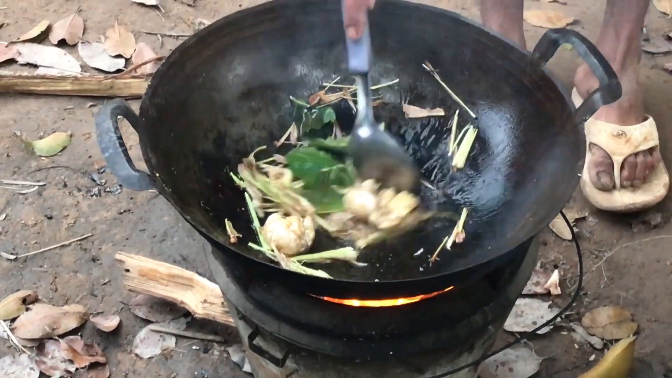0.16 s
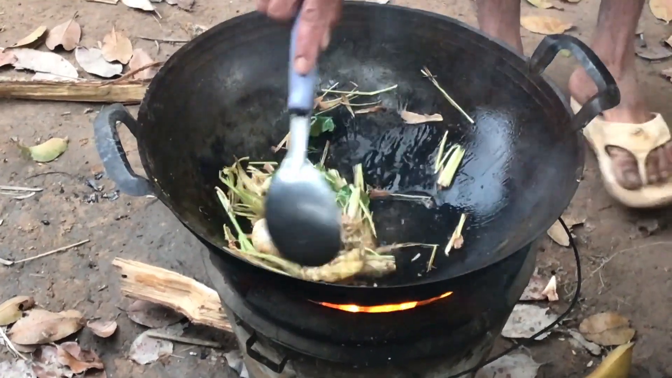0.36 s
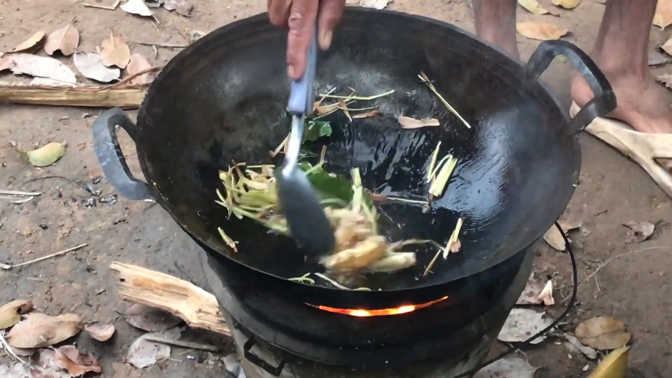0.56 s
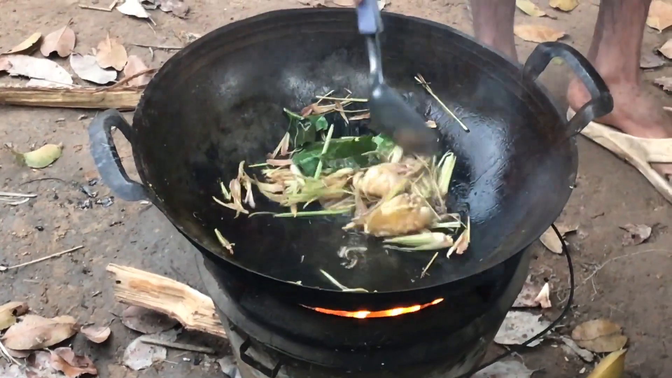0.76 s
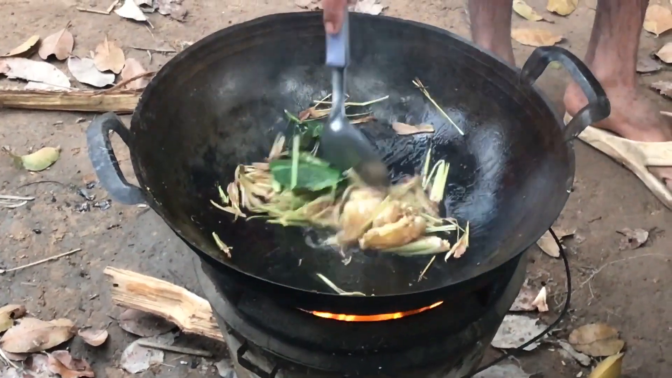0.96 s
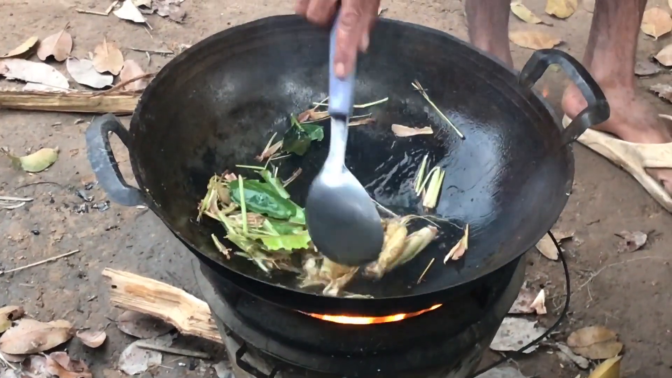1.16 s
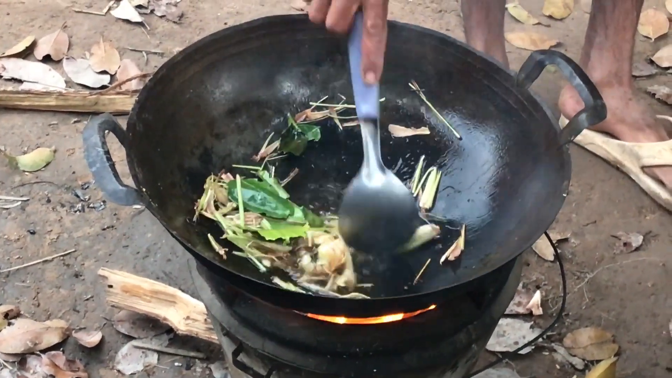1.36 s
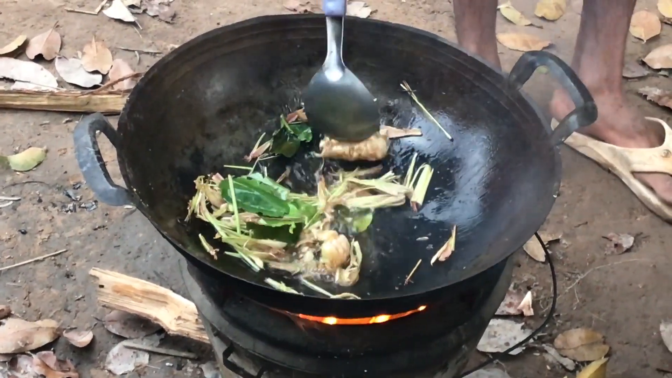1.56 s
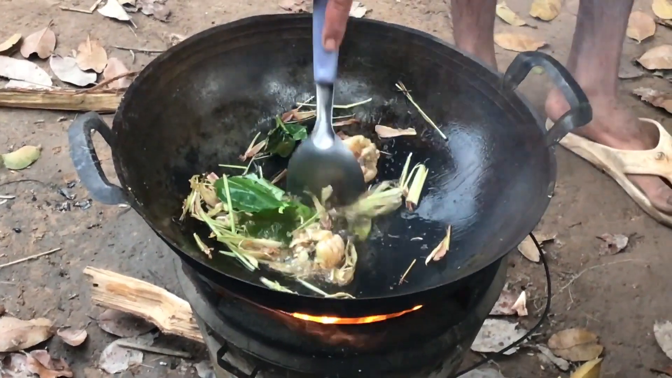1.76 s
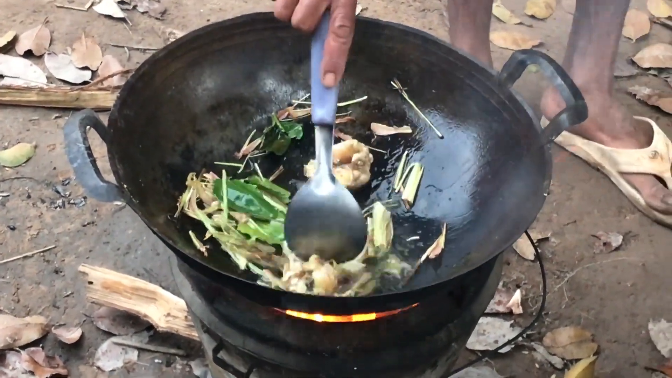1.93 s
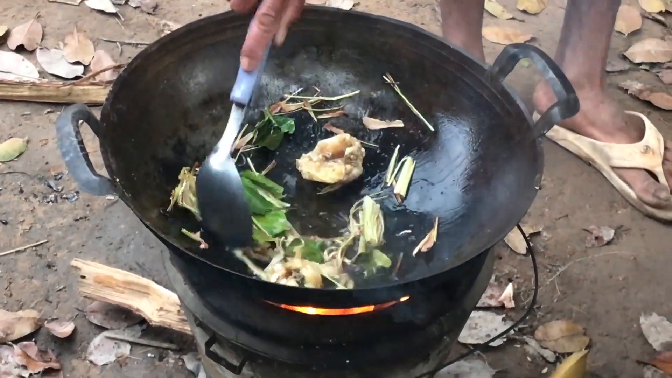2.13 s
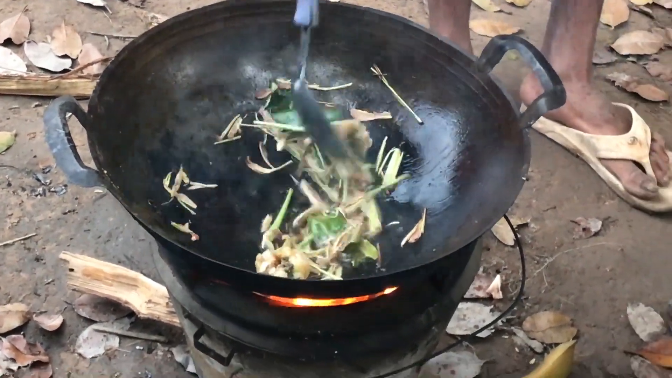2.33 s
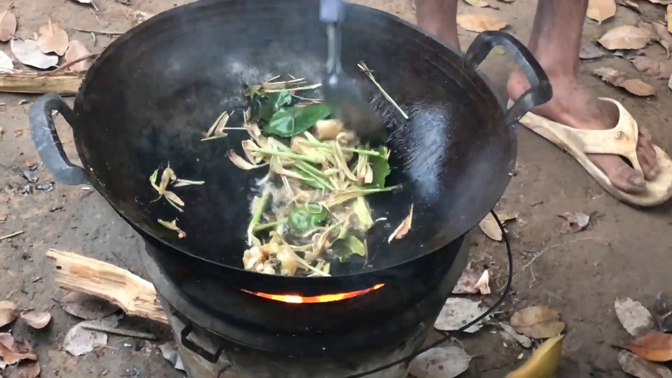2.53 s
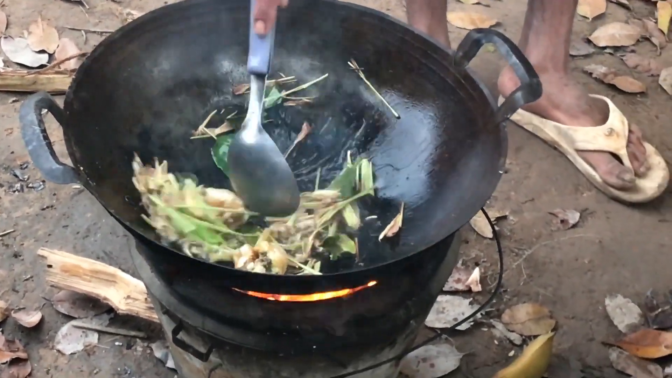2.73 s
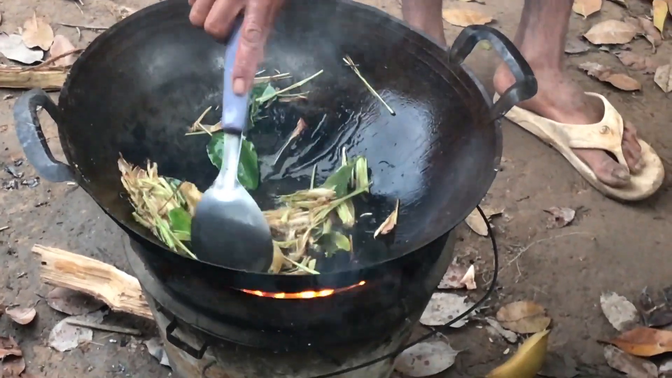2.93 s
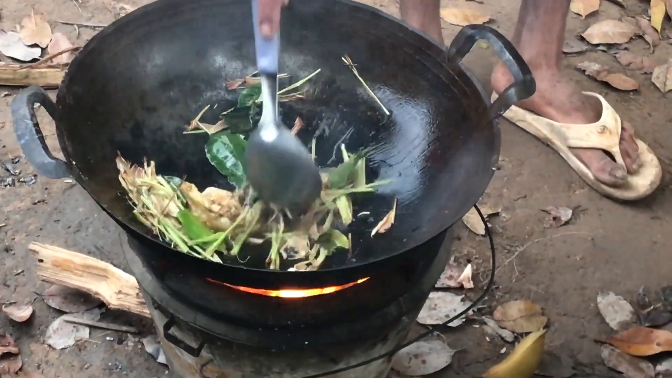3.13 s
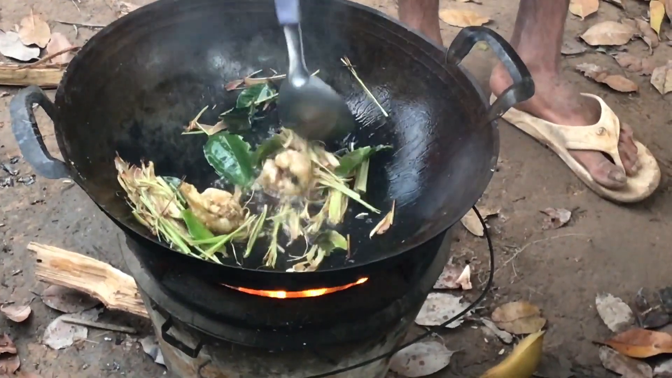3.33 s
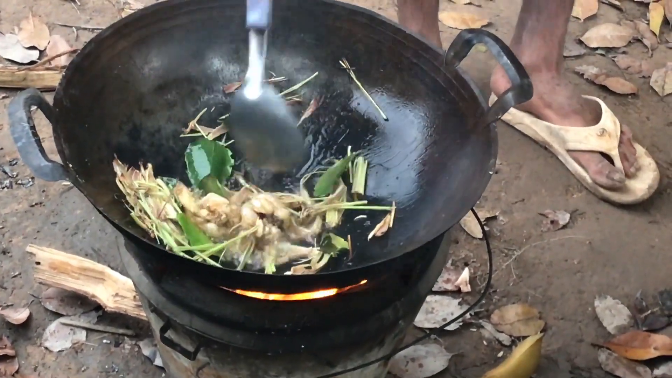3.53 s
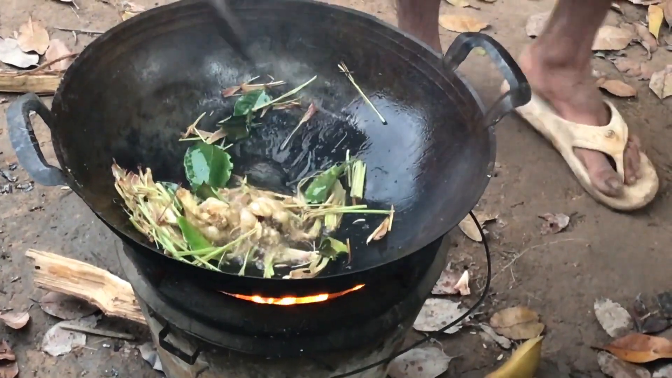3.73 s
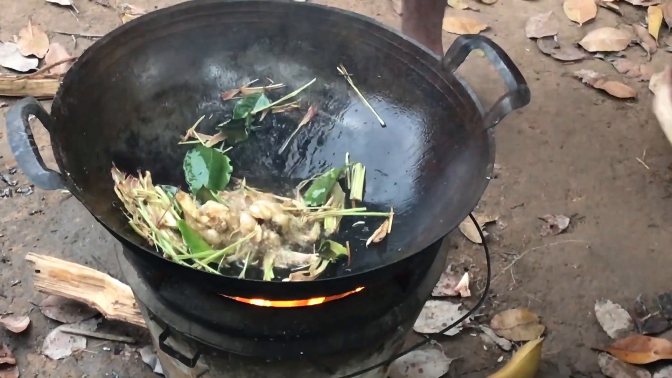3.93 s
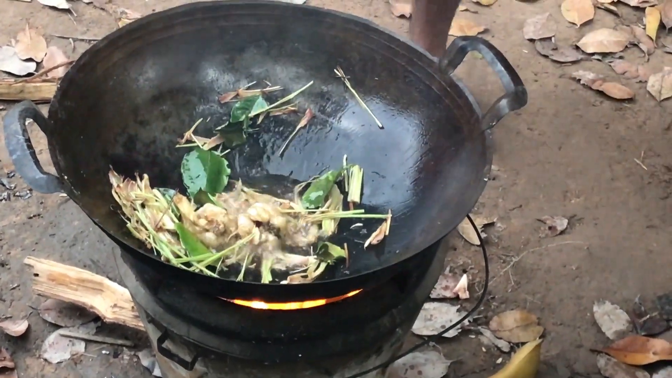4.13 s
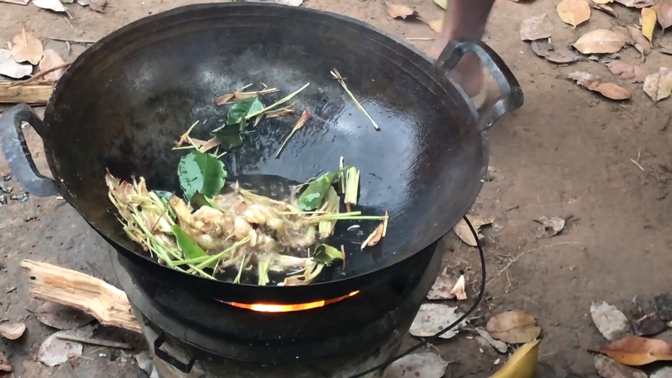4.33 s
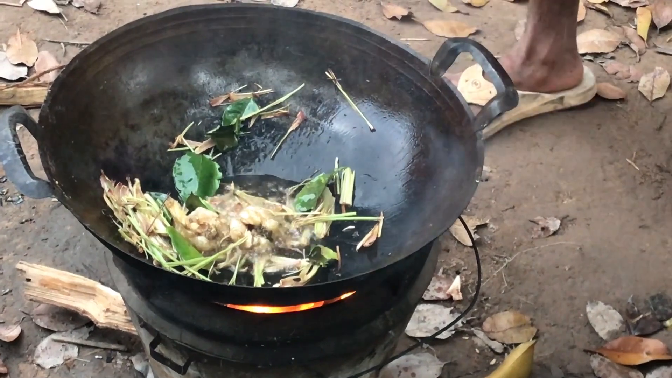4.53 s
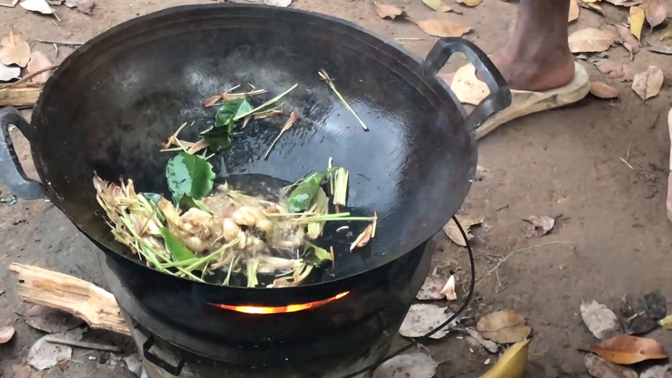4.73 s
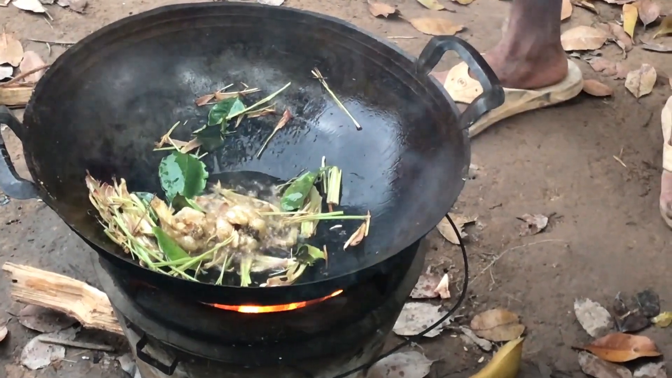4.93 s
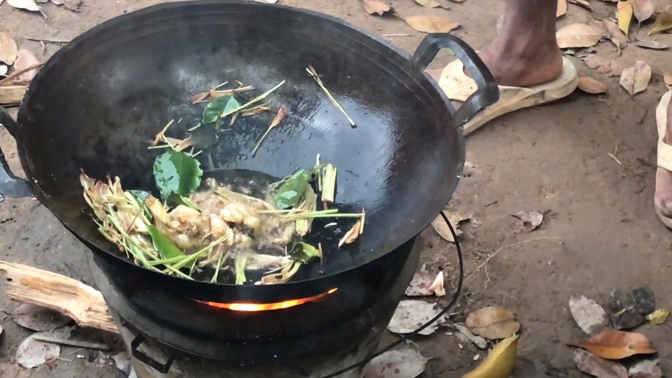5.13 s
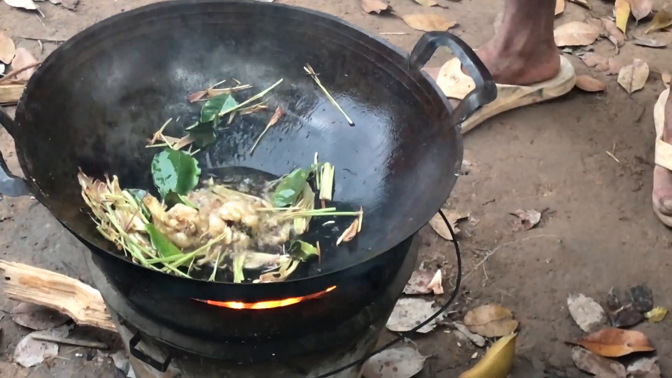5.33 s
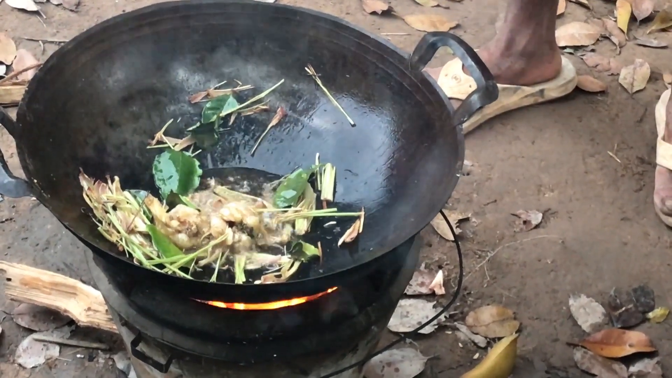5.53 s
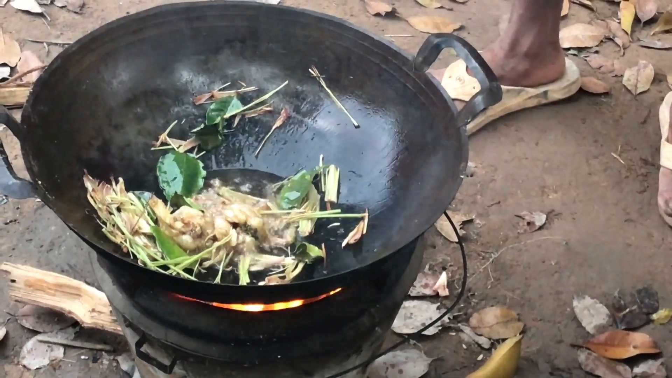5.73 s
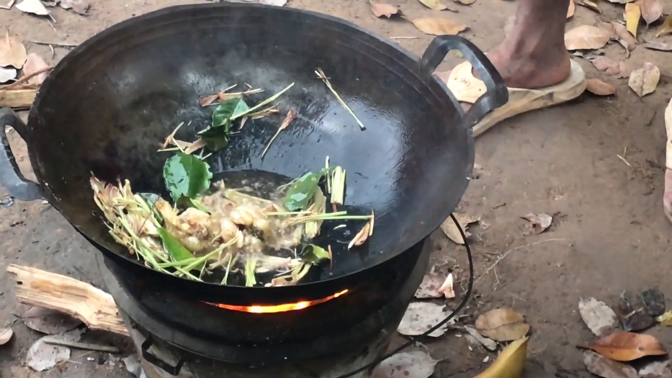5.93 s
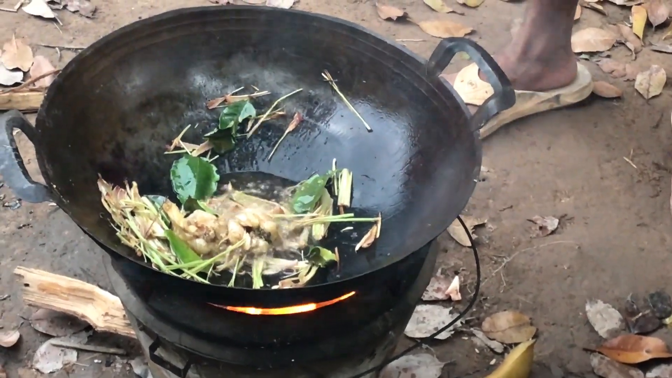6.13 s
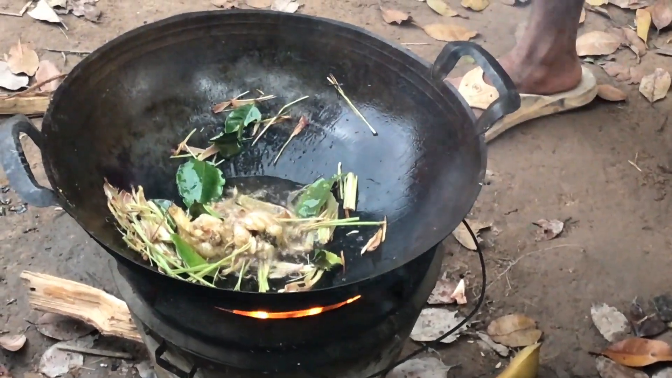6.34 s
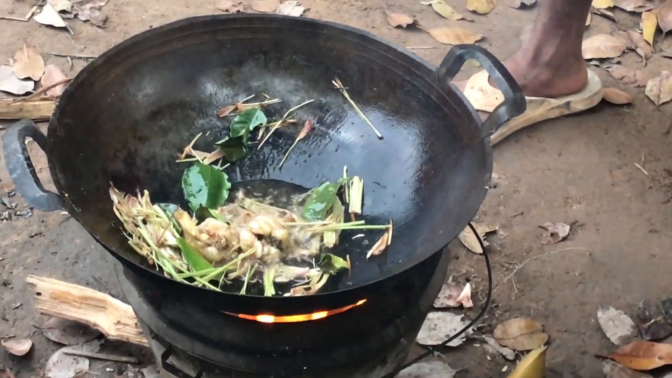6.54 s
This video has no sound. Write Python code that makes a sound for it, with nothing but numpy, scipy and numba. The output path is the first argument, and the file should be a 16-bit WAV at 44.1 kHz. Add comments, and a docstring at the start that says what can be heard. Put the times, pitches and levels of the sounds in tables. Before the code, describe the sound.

Food sizzles and spits in an oily wok outdoors while a metal spoon knocks and scrapes for three seconds, then the frying crackles on, slowly fading.

```python
"""Chicken and herbs fry in a wok outdoors on a charcoal stove: a steady sizzle that slowly dies down.
For about three seconds a metal spoon knocks, scrapes and taps the pan; one late tap and soft scuffs follow.
Clicks through colour filters make the fizzing oil, sharp bursts the pops, and filtered noise the spitting
steam; fading tones make the ringing metal. A wavering rumble, two hums and soft air lie underneath."""
import sys
import numpy as np
from scipy import signal
from scipy.fft import rfft, irfft
from scipy.io import wavfile
from scipy.ndimage import uniform_filter1d
from numba import njit

SR = 44100
rng = np.random.default_rng(int(sys.argv[2]) if len(sys.argv) > 2 else 0)


def file_out(sig):
    """Save sig as 16-bit WAV at sys.argv[1]."""
    # one column per channel
    cols = np.atleast_2d(sig).T
    # limit, then scale
    lim = np.clip(cols, -1, 1)
    pcm = np.round(lim * 32767).astype(np.int16)
    wavfile.write(sys.argv[1], SR, pcm)


N = 295029
T = np.arange(N) / SR  # time through the whole scene [s]
HIT = T[:SR // 4]  # time through one short sound [s]

# ringing of the wok: (frequency [Hz], width [Hz], relative level [dB]); a wider mode fades sooner
WOK_MODES = [(207, 19, -9), (318, 50, 6.5), (388, 44, 2), (574, 41, -1), (765, 44, -6), (914, 20, -2.5),
             (1240, 32, -5.5), (1590, 27, -5), (1700, 19, -4), (1920, 66, -8), (2080, 110, 7),
             (2244, 71, -2.5), (2470, 89, 2.5), (2817, 61, -3.5), (3006, 82, -0.5), (3150, 27, -27),
             (3500, 15, -7.5), (3400, 38, -6), (3720, 23, -4), (3740, 41, -12), (5200, 26, -13),
             (5300, 42, -5.5)]
# colour of the mid simmer, also used for grit and snaps: (frequency [Hz], relative level [dB])
SIMMER_COLOUR = [(300, -43.5), (520, -11), (780, -9.5), (1200, -4.5), (1700, -4), (2200, -3.5), (2800, -1),
                 (3450, 0), (4200, -1.5), (5300, -10), (7000, -17), (9000, -19.5), (14000, -30.5)]
# colour of the fine fizz: (frequency [Hz], relative level [dB])
FIZZ_COLOUR = [(700, -4), (1200, 0.5), (3000, -13), (5500, 10), (7200, -3), (8800, 6.5), (10300, 0.5),
               (11500, 3), (14000, 2.5), (15500, -5.5), (16500, -13)]


def undb(db):
    """Turn decibels into a gain."""
    return 10 ** (np.asarray(db) / 20)


def unit(x):
    """Scale to a peak of one."""
    return x / np.abs(x).max()


def level(x, db, lo, hi):
    """Scale so that the part between lo and hi Hz has the given rms level."""
    f = np.arange(len(x) // 2 + 1) * SR / len(x)
    in_band = (f > lo) & (f < hi)
    band = irfft(rfft(x) * in_band, len(x))
    return x * undb(db) / np.std(band)


def add(out, s, x):
    """Mix in a sound that starts at s seconds."""
    i = max(int(s * SR), 0)
    out[i:i + len(x)] += x[:max(N - i, 0)]


def colour(x, points, size=1024):
    """Shape the tone through (Hz, dB) points with a filter that never acts ahead of its input."""
    hz, db = np.transpose(points)
    f = np.maximum(np.arange(size // 2 + 1) * SR / size, 1)
    gain = undb(np.interp(np.log(f), np.log(hz), db))
    # folding the cepstrum puts the filter's energy as early as possible
    cepstrum = irfft(np.log(gain))[:size // 2]
    cepstrum[1:] *= 2
    response = irfft(np.exp(rfft(cepstrum, size)))
    return signal.fftconvolve(x, response)[:len(x)]


def walk(rate):
    """Wander smoothly and at random, with about `rate` new steps a second and a spread near one."""
    k = int(SR / rate)
    steps = np.repeat(rng.standard_normal(N // k + 1), k)
    smooth = uniform_filter1d(uniform_filter1d(steps, k), k)
    return smooth[:N] * np.sqrt(2)


def ring(modes, size=SR // 4):
    """Add up fading tones; random strengths and signs stand for different contact points."""
    hz, width, db = np.transpose(modes)[:, :, None]
    t = HIT[:size]
    sign = rng.choice([-1, 1], hz.shape)
    gain = undb(db + rng.standard_normal(hz.shape)) * sign
    return np.sum(gain * np.exp(-np.pi * width * t) * np.sin(2 * np.pi * hz * t), axis=0)


def clicks(rate, spread_db, cap_db):
    """Scatter `rate` clicks a second, with random signs and an exponential spread of sizes in dB."""
    size = undb(np.minimum(spread_db * rng.exponential(size=N), cap_db))
    return (rng.random(N) < rate / SR) * size * rng.choice([-1, 1], N)


@njit
def bandpass(x, hz, width):
    """Let one band through with a state-variable filter whose centre may move."""
    y, b, l = np.empty(len(x)), 0., 0.
    for i in range(len(x)):
        g, k = np.tan(np.pi * hz[i] / SR), width / hz[i]
        v = (b + g * (x[i] - l)) / (1 + g * (g + k))
        b, l, y[i] = 2 * v - b, l + 2 * g * v, k * v
    return y


def frying():
    """Simmer and fizz sink steadily in dB as the food dries, and rise with each flare."""
    # the spoon turns wet food onto hot iron and frying flares: (time of the height [s], rise [dB])
    flare_list = [(0.018, 7), (0.83, 4), (1.12, 4), (2.2, 5.5), (2.57, 4.5), (3.82, 0.5)]
    rise_s, fall_s = 0.17, 0.086
    simmer_start_db, simmer_fall_db_per_s = -63, 0.86
    fizz_start_db, fizz_fall_db_per_s = -70.5, 1.33
    fizz_share = 0.41  # part of a flare's rise in dB that the fizz follows
    flare = sum(db * np.exp(-np.abs(T - s) / np.where(T < s, rise_s, fall_s)) for s, db in flare_list)
    simmer_level = simmer_start_db - simmer_fall_db_per_s * T + flare
    fizz_level = fizz_start_db - fizz_fall_db_per_s * T + fizz_share * flare
    return simmer_level, fizz_level


def sizzle(simmer_db=-0.5, fizz_db=-3, crackle_db=-4, sputter_db=-7):
    """Countless bubbles simmer in the food and fizz on hot iron, with sharper droplets in both."""
    simmer_level, fizz_level = frying()
    bubbles = clicks(rate=5000, spread_db=3.8, cap_db=20) * undb(2 * walk(60))
    mist = clicks(rate=7000, spread_db=3.6, cap_db=20)
    # stirring spreads juice over the iron: the stronger the fizz, the more droplets burst each second
    droplets = 150 * undb(fizz_level + 70 + 3 * walk(12))
    crackle = clicks(rate=droplets, spread_db=6.5, cap_db=19)
    sputter = clicks(rate=droplets, spread_db=6, cap_db=18)
    # every crackling droplet throws a little spray after its snap
    t = HIT[:256]
    spray = (t == 0) + .035 * rng.standard_normal(256) * np.exp(-t / .002)
    crackle = signal.fftconvolve(crackle, spray)[:N]
    simmer = level(colour(bubbles, SIMMER_COLOUR), simmer_db, 2000, 5000)
    simmer += level(colour(sputter, SIMMER_COLOUR), sputter_db, 2000, 5000)
    fizz = level(colour(mist, FIZZ_COLOUR), fizz_db, 8000, 15000)
    fizz += level(colour(crackle, FIZZ_COLOUR), crackle_db, 8000, 15000)
    return simmer * undb(simmer_level) + fizz * undb(fizz_level)


def background(rumble_hz=64.15, rumble_width_hz=10.2):
    """Narrow noise rumbles, a sine hums like a distant motor, a higher one fades, and soft air hisses."""
    # slow course of the rumble, before its quick waver: (time [s], level [dB])
    rumble_course = [(0, -53.5), (1.2, -56.5), (1.6, -51), (2.95, -59.5), (3.3, -56), (4.4, -52.5),
                     (4.7, -60), (5.15, -50.5), (5.8, -59.5), (6.12, -47.5), (6.5, -65.5), (6.68, -52)]
    # colour of the outdoor air, capped at -13 dB below: (frequency [Hz], relative level [dB])
    air_colour = [(12, -57), (20, -18), (41, -5), (60, 1), (103, -6), (119, -7.5), (144, -15), (218, -24),
                  (363, -27), (440, -34), (698, -40), (780, -71), (900, -34.5), (1170, -60), (1980, -120)]
    hum_hz, hum_db = 93.2, -58.5
    faint_hz, faint_start_db, faint_fall_db_per_s = 255, -68.5, 3.5

    centre = np.full(N, 1. * rumble_hz)
    rumble = bandpass(rng.standard_normal(N), centre, 1. * rumble_width_hz)
    rumble = bandpass(rumble, centre, 2. * rumble_width_hz)
    rumble /= np.sqrt(uniform_filter1d(rumble ** 2, SR // 4))  # even out its own swells
    rumble *= undb(np.interp(T, *np.transpose(rumble_course)) + 1.5 * walk(7.7))

    hum_gain = np.sqrt(2) * undb(hum_db + 0.37 * walk(6.0))
    hum = hum_gain * np.sin(2 * np.pi * np.cumsum(hum_hz + 0.27 * walk(2.1)) / SR)
    faint_gain = np.sqrt(2) * undb(faint_start_db - faint_fall_db_per_s * T + 2 * walk(10))
    hum += faint_gain * np.sin(2 * np.pi * np.cumsum(faint_hz + 7 * walk(25)) / SR)

    air = colour(rng.standard_normal(N), [(hz, min(db, -13)) for hz, db in air_colour], size=16384)
    return rumble + hum + level(air, -65.5, 114, 960)


def crunch(decay_s):
    """Metal meets crust in a short, gritty burst of fading noise."""
    return colour(rng.standard_normal(len(HIT)) * np.exp(-HIT / decay_s), SIMMER_COLOUR)


def knocks(swell_s=0.0013, bend_s=0.0023, lag_s=.003, clack_db=1, clink_db=-2, ring_db=-24,
           shudder_db=-22, boom_db=2, boom_hz=178):
    """The food-damped pan knocks dully; bending waves bring the highs first, so the note drops."""
    # spoon knocks on the wok; the note scales a falling pitch, the boom is the pan on the stove:
    # (time [s], relative level [dB], clack [dB], clink [dB], note [Hz], boom [dB])
    knock_list = [(0.041, -27, -17.5, -19, 325, -36), (0.434, -30.5, -15.5, -17, 318, -40),
                  (0.851, -22.5, -6, -7, 380, -20), (1.278, -27.5, -22, -7.5, 320, -30),
                  (1.724, -30.5, -43, -21, 310, -42), (2.1, -29, -15.5, -5.5, 320, -39),
                  (2.512, -25.5, -6.5, -9, 363, -17), (2.929, -40.5, -27, -16, 313, -29),
                  (3.068, -20, -21, -19, 331, -13), (3.082, -28.5, -21, -36, 350, -4.5),
                  (3.117, -35, -35, -26, 316, -21), (3.126, -35, -43, -37, 340, -9),
                  (3.166, -41, -38, -34, 304, -10), (3.354, -27.5, -53, -17.5, 336, -18)]
    # short-lived modes under a hard blow: (frequency [Hz], width [Hz], relative level [dB])
    clack_modes = [(610, 390, -3), (850, 96, 2), (1100, 150, 7.5)]
    # short-lived modes of the pressed spoon: (frequency [Hz], width [Hz], relative level [dB])
    spoon_modes = [(2213, 85, -5), (3267, 113, -0.5), (4580, 630, 3.5), (5220, 720, -8.5)]
    shudder_colour = [(100, -60), (190, -2.5), (330, -0.5), (560, 1.5), (760, -24), (2000, -41)]
    out = np.zeros(N)
    for s, db, clack, clink, hz, weight in knock_list:
        pitch = hz * (0.83 + 0.98 * np.exp(-HIT / bend_s))
        swell = HIT ** 2 * np.exp(-HIT / swell_s)
        thud = unit(swell * np.sin(2 * np.pi * np.cumsum(pitch) / SR))
        shudder = colour(rng.standard_normal(len(HIT)), shudder_colour)
        shudder *= np.exp(-HIT / .021) / np.std(shudder)
        boom = HIT * np.exp(-HIT / .0045) * np.sin(2 * np.pi * boom_hz * HIT)
        hard = np.zeros(len(HIT))
        for k, (f, w, g) in enumerate(clack_modes):
            mode = np.exp(-np.pi * w * HIT) * np.sin(2 * np.pi * f * HIT)
            hard += mode * undb(g) * (-1) ** k  # signs alternate from mode to mode
        metal = unit(ring(spoon_modes)) + .3 * unit(crunch(.006))
        # each part is set against the strength of the thud
        parts = [(boom, weight + boom_db), (hard, clack + clack_db), (metal, clink + clink_db)]
        contact = sum(undb(share) * part / np.std(part) for part, share in parts)
        low_modes = unit(ring([m for m in WOK_MODES if m[0] < 1000]))
        tail = undb(shudder_db) * shudder + undb(ring_db) * low_modes
        add(out, s + lag_s, undb(db) * (thud + np.std(thud) * contact + tail))
    return out * undb(2.5)


def puff(hz, width_hz=1980.0, decay_s=0.0065, spray_db=-20, crackle_db=-9, snap_db=-6):
    """The oil film snaps and steam tears through in crackles, usually rising a little in pitch."""
    # tone of escaping steam: (frequency [Hz], relative level [dB])
    steam_colour = [(500, -23), (1200, 0), (2200, 2.5), (3500, 3), (5300, -5), (7000, -10.5), (12000, -28)]
    t = HIT[:2048]
    glide = 1 + rng.uniform(-.05, .35) * (.5 - np.exp(-t / .005))
    centre = np.clip(hz * glide, 500, SR / 4)
    flow = np.exp(-t / (decay_s * rng.uniform(.6, 1.4))) + undb(spray_db) * np.exp(-t / .011)
    # uneven random strength makes the gas crackle
    gas = rng.standard_normal(len(t)) * np.sqrt(rng.exponential(size=len(t))) * flow
    hiss = bandpass(bandpass(gas, centre, 1. * width_hz), centre, 1. * width_hz)
    crackle = undb(crackle_db) * unit(colour(gas, SIMMER_COLOUR))
    snap = undb(snap_db) * rng.uniform(0, 0.75) * unit(colour(1. * (t == 0), SIMMER_COLOUR))
    return unit(colour(unit(hiss) + crackle + snap, steam_colour))


def spits(gain_db=3, small_db=-50, spread_db=6.0, follow=0.14, count=200):
    """Steam escapes in single loud puffs among many small ones, stronger while the food fries hard."""
    # the loudest puffs from the food: (time [s], relative level [dB], nominal pitch [Hz])
    puff_list = [(0.1583, -40, 3080), (0.819, -41, 3520), (1.1184, -45, 2930), (1.344, -38.5, 2480),
                 (1.3686, -42, 3470), (1.877, -41.5, 2520), (2.298, -33.5, 2290), (3.0025, -42, 3500),
                 (3.3797, -37.5, 3500), (3.769, -37.5, 2260), (3.872, -45, 2230), (4.1482, -43.5, 3400),
                 (4.2546, -45.5, 2950), (4.365, -37.5, 3570), (4.5286, -47.5, 4550), (4.5954, -48, 4500),
                 (4.7013, -41, 3160), (4.8545, -42.5, 2880), (4.9836, -43.5, 3940), (5.016, -43, 2900),
                 (5.052, -40.5, 3540), (5.269, -44.5, 3720), (5.3868, -46.5, 3840), (5.6194, -41.5, 3970),
                 (5.7246, -41, 3620), (5.877, -36.5, 2660), (6.2374, -38, 3270), (6.4206, -47.5, 3000),
                 (6.5645, -42.5, 3240)]
    out = np.zeros(N)
    for s, db, hz in puff_list:
        add(out, s + .0015, undb(db + gain_db) * puff(hz))
    simmer_level, _ = frying()
    strength_db = follow * (simmer_level - simmer_level.mean())
    for when, size, pitch in rng.random((count, 3)):
        i = int(when * N)
        db = small_db + strength_db[i] + spread_db * size ** 3
        add(out, T[i], undb(db) * puff(2200 + 2700 * pitch))
    return out


def pops(snap_db=3, body_db=0, splash_db=-26, small_db=-50, spread_db=7, follow=1.0, count=55):
    """Droplets burst with a snap, a short ring and a trace of spray; small ones thin out as the food dries."""
    # the loudest droplets bursting in oil: (time [s], relative snap level [dB], body against snap [dB])
    pop_list = [(0.2197, -42.5, 8), (0.608, -39.5, 5), (0.6811, -38.5, 1), (0.8052, -32, -9),
                (1.0963, -38, 0), (1.1562, -37.5, -20), (1.1911, -37.5, -16), (1.272, -37, -6),
                (1.3963, -41.5, 2), (1.491, -38, 1.5), (1.8515, -40, -4), (2.3023, -44, -2),
                (2.5124, -38.5, 5), (2.725, -31, -39), (2.9055, -39, 0), (3.211, -48.5, 11.5),
                (3.268, -35.5, 2.5), (3.428, -41, 0.5), (3.7979, -34, 0), (3.8287, -40.5, 9.5),
                (4.0776, -40, 1), (4.4171, -44.5, 7.5), (4.9934, -43, 3.5), (5.0479, -37, 0.5),
                (5.218, -45.5, 13.5), (5.712, -34, -3.5), (5.7623, -36, -21), (5.8627, -38.5, 1),
                (6.108, -46.5, 10), (6.3819, -40.5, -17)]
    out, t = np.zeros(N), HIT[:1024]
    _, fizz_level = frying()
    strength_db = follow * (fizz_level - fizz_level.mean())
    small = []
    for when, size, depth in rng.random((count, 3)):
        i = int(when ** 1.3 * N)  # the power crowds them towards the start
        small.append((T[i], small_db + strength_db[i] + spread_db * size ** 2, 8 - 20 * depth))
    for s, db, body in pop_list + small:
        spray = rng.standard_normal(len(t)) * np.exp(-t / .0015)
        burst = (t == 0) + undb(splash_db) * spray
        cavity = colour(burst, SIMMER_COLOUR)
        snap = colour(burst, FIZZ_COLOUR)
        sound = snap + undb(body + body_db) * cavity * np.std(snap) / np.std(cavity)
        add(out, s + 0.001296, undb(db + snap_db) * sound / np.abs(snap).max())
    return out


def scrapes():
    """The spoon sticks and slips over the crusted pan and keeps its modes ringing."""
    # strokes along the pan: (time [s], length [s], rasp level [dB], drone level [dB], rasp centre [Hz])
    stroke_list = [(0.433, 0.13, -69, -52.5, 2800), (0.846, 0.063, -58, -44, 3500),
                   (0.911, 0.097, -53, -53.5, 3540), (1.296, 0.06, -63, -58, 3200),
                   (1.738, 0.068, -56.5, -59, 3220), (2.13, 0.066, -53.5, -51.5, 2460),
                   (2.17, 0.06, -47.5, -54.5, 2130), (2.239, 0.024, -47, -51, 2700),
                   (2.519, 0.076, -50.5, -47, 4360), (2.608, 0.032, -52, -57.5, 3270),
                   (3.075, 0.091, -66, -51, 3200)]
    slips = clicks(rate=900, spread_db=4, cap_db=14) * undb(4.5 * walk(90))
    high = signal.fftconvolve(slips, ring([m for m in WOK_MODES if m[0] > 650]))[:N]
    low = signal.fftconvolve(slips, ring([m for m in WOK_MODES if m[0] <= 650]))[:N]
    grit = colour(slips, SIMMER_COLOUR)
    bright = high / np.std(high) + 0.51 * grit / np.std(grit)
    out = np.zeros(N)
    for s, length, rasp_db, drone_db, hz in stroke_list:
        # the small power makes the pressure rise and let go quickly
        pressure = np.abs(np.sin(np.pi * np.clip((T - s) / length, 0, 1))) ** 0.21
        touching = pressure > .5
        rasp = bandpass(bright, np.full(N, 1. * hz), 2800.)
        rasp = undb(rasp_db) * rasp / np.std(rasp[touching])
        drone = undb(drone_db) * low / np.std(low[touching])
        out += pressure * (rasp + drone)
    return out


def taps(iron_db=-8):
    """The spoon's edge ticks the bare iron and both ring briefly."""
    # light taps: (time [s], relative level [dB], ring of the spoon [dB])
    tap_list = [(0.475, -31.5, -40), (0.9333, -32, -31), (2.2434, -37, -26), (4.629, -37, -13)]
    # thin ring of the free spoon: (frequency [Hz], width [Hz], relative level [dB])
    free_modes = [(6300, 47, 8), (8700, 27, -9)]
    out = np.zeros(N)
    for s, db, free_db in tap_list:
        tick = unit(colour(1. * (HIT == 0), SIMMER_COLOUR)) + .6 * unit(crunch(.002))
        iron = undb(iron_db) * unit(ring(WOK_MODES))
        spoon = undb(free_db) * unit(ring(free_modes))
        add(out, s, undb(db) * (tick + iron + spoon))
    return out


def scuffs():
    """Sandals drag softly over dry earth, heard as coloured grains that swell and fade."""
    # scuffs as the cook steps back: (time [s], length [s], level at the height [dB])
    scuff_list = [(4.625, 0.02, -49.5), (4.63, 0.075, -64.5), (4.73, 0.23, -65.5), (5.127, 0.051, -66),
                  (6.257, 0.12, -61.5)]
    # colour of the grains: (frequency [Hz], relative level [dB])
    earth_colour = [(350, -24), (560, -7.5), (710, 7.5), (820, -11.5), (1000, 2.5), (1300, -8), (2200, 3),
                    (3200, -30), (6000, -28)]
    # a negative spread makes most grains nearly full size and a few much smaller
    grains = colour(clicks(rate=870, spread_db=-1.0, cap_db=12), earth_colour)
    pressure = np.zeros(N)
    for s, length, db in scuff_list:
        pressure += undb(db) * np.sin(np.pi * np.clip((T - s) / length, 0, 1))
    return pressure * grains / np.std(grains)


def scene():
    """Mix the frying food, the spoon and the surroundings into one channel."""
    food = sizzle() + spits() + pops()
    spoon = knocks() + scrapes() + taps()
    return (food + spoon + scuffs() + background())[None]


def record(dry, low_cut_hz=42, top_hz=16200):
    """The recorder cuts the deepest bass and the top."""
    dry = signal.sosfilt(signal.butter(3, low_cut_hz, "high", fs=SR, output="sos"), dry)
    return signal.sosfilt(signal.ellip(8, .2, 70, top_hz, fs=SR, output="sos"), dry)


dry = scene()
out = record(dry)
file_out(out)
```